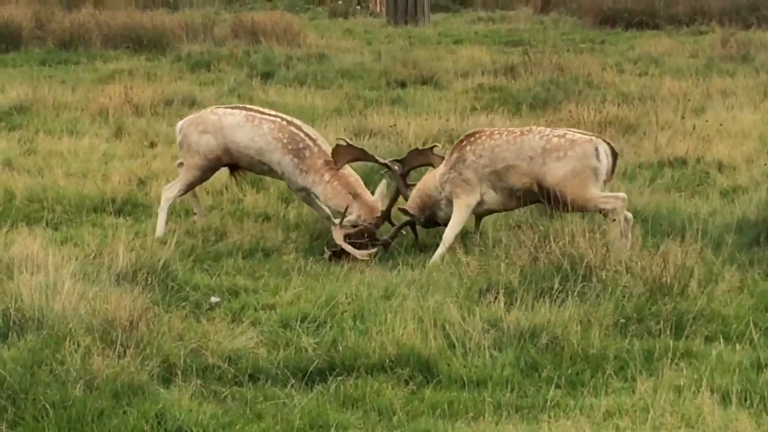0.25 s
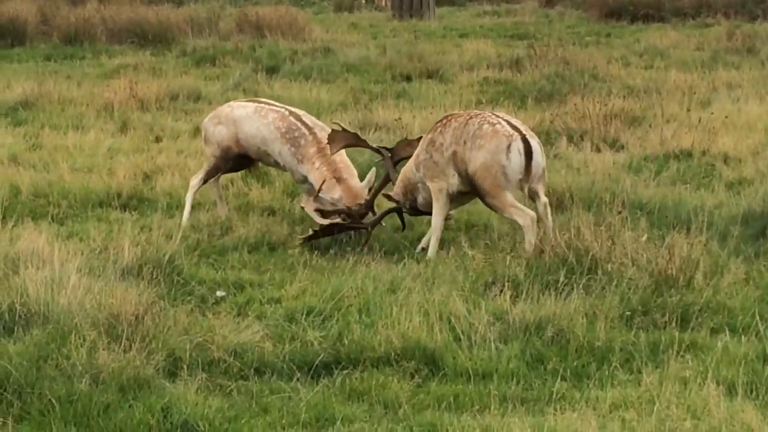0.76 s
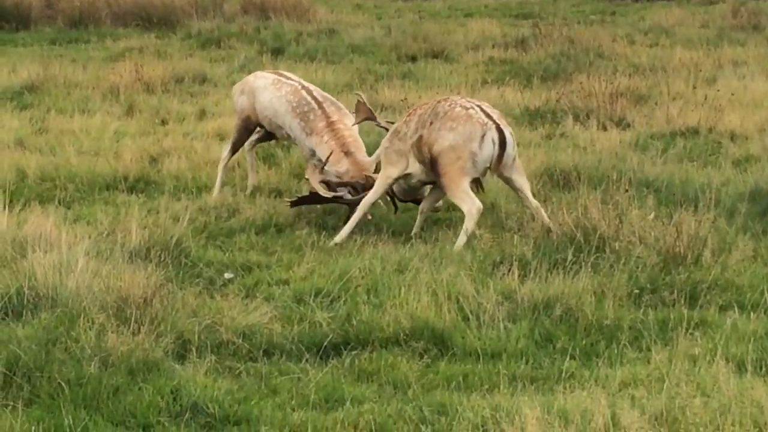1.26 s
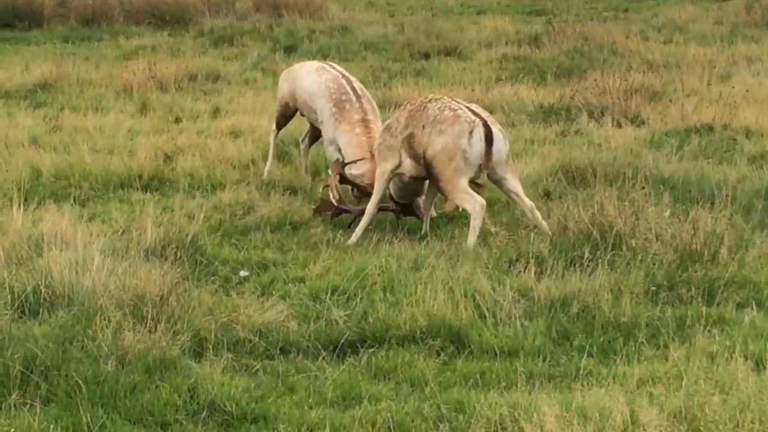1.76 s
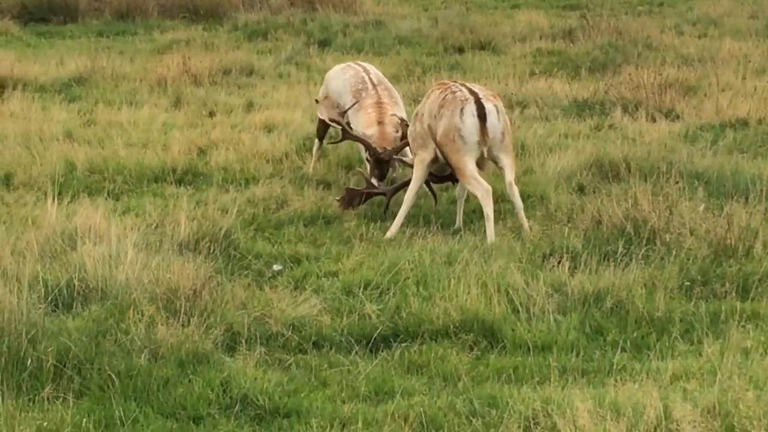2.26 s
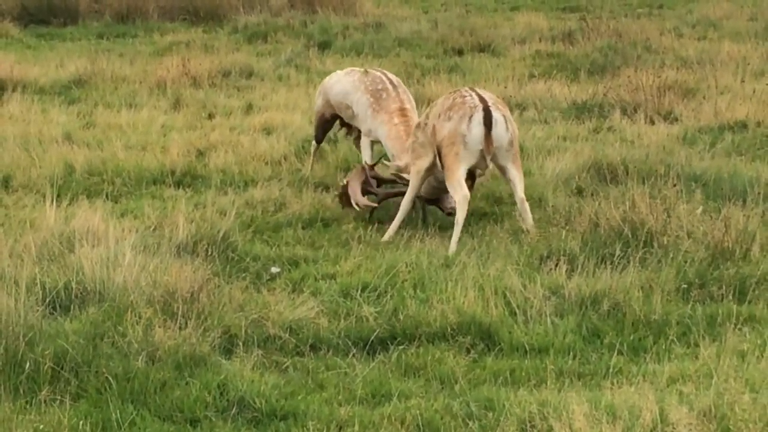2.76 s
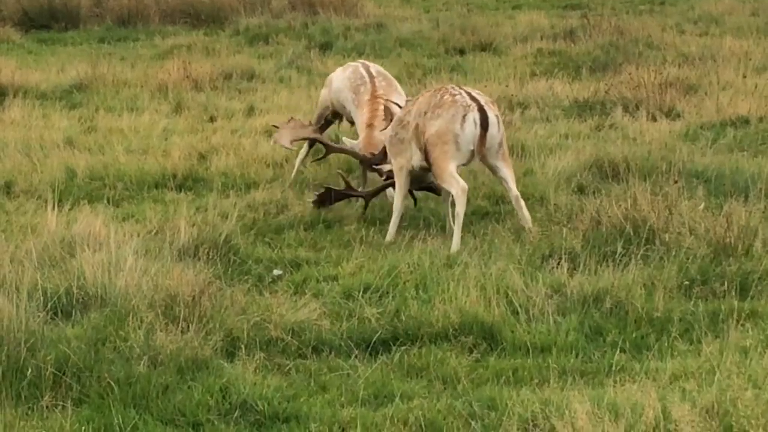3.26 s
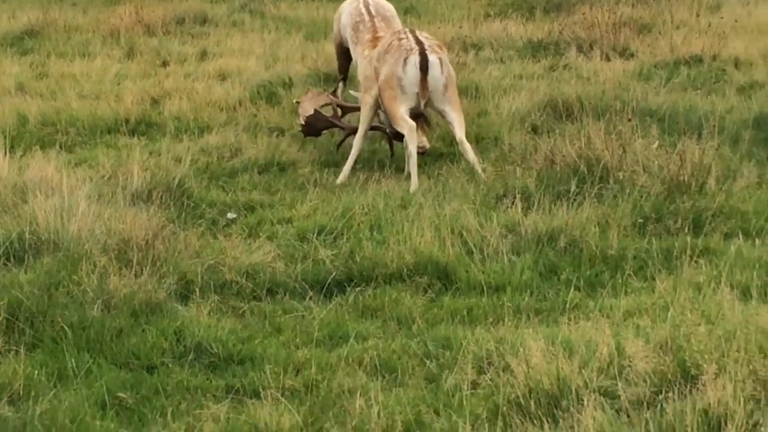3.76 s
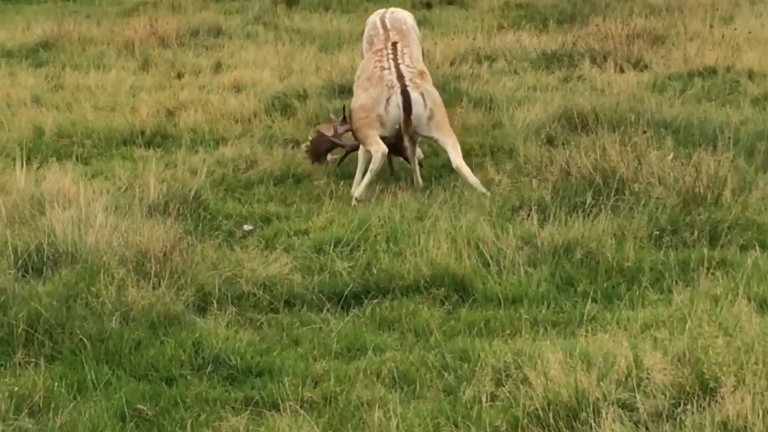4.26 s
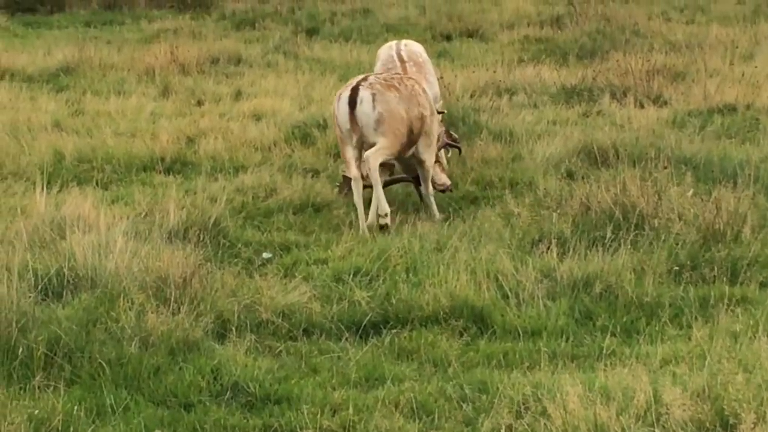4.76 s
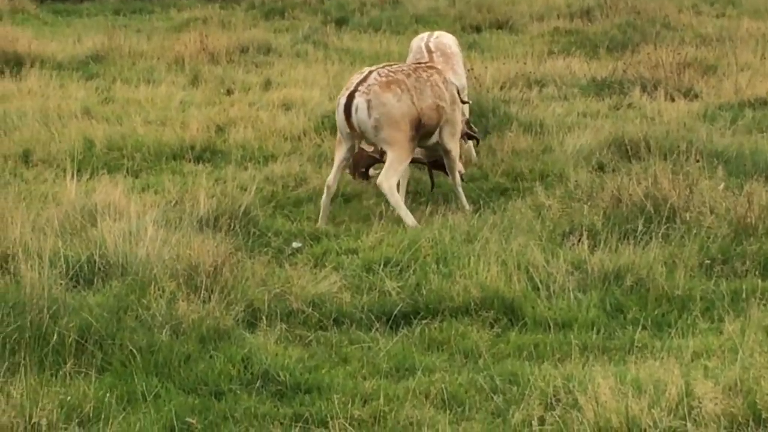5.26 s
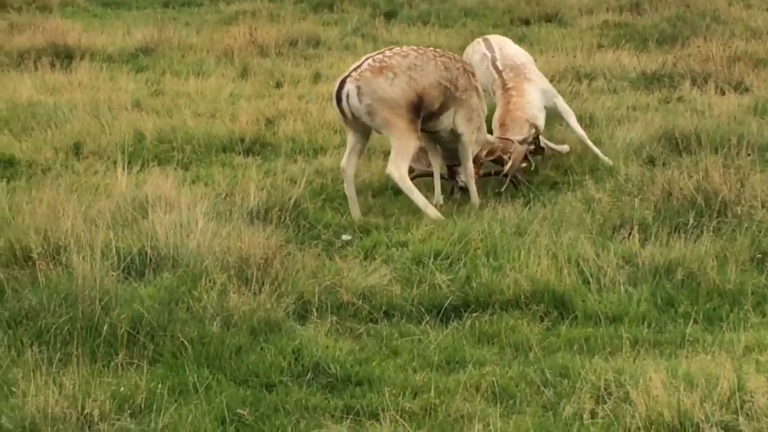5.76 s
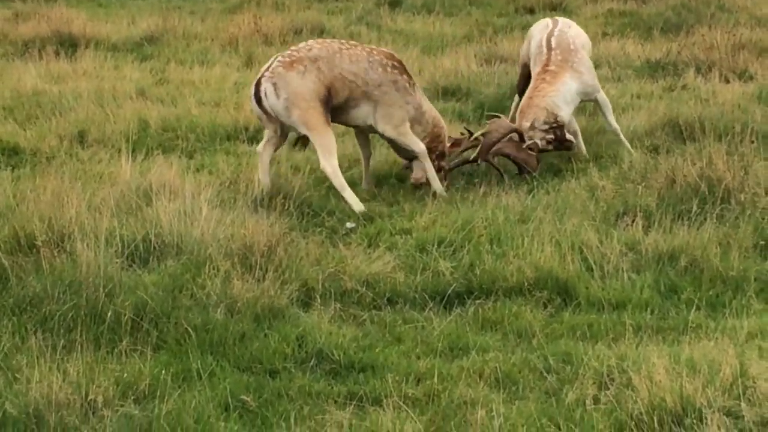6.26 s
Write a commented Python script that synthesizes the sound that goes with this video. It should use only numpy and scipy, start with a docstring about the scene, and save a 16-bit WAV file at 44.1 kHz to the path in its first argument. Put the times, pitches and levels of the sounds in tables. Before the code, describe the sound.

Two bucks spar on open grass, antlers clacking, rattling and scraping in uneven bursts over dull hoof thuds, grass swish and faint bird calls.

```python
"""Antlers clack, rebound and scrape in bouts as two fallow bucks spar on open grassland, some way off.
Hooves and lunging bodies thud, legs swish through grass, dry stalks tick, a far bird calls over a low park
murmur. The antlers are resonators struck by short forces or rubbed by many tiny slips. Thuds are low sine
waves with dull noise; grass, ground and park are coloured noise; the bird is a falling tone with harmonics."""
import sys
import numpy as np
from scipy import signal
from scipy.fft import rfft, irfft
from scipy.io import wavfile

SR = 44100
rng = np.random.default_rng(int(sys.argv[2]) if len(sys.argv) > 2 else 0)


def master(y):
    """Save y as 16-bit WAV."""
    cut = np.clip(np.atleast_2d(y).T, -1, 1)
    pcm = np.round(cut * 32767)  # scale
    wavfile.write(sys.argv[1], SR, pcm.astype(np.int16))


N = 287091

# antler blows: [t/s, level/dB, ring of the struck part f/Hz, top of the contact f/Hz,
# hardness/dB per octave, drag (no unit: .4 is a clean tap, 1.6 is grinding)]
BLOWS = [(0.0252, -34.5, 2500, 10800, -1, 1.06), (0.098, -35, 864, 11900, -3.0, 1.06),
         (0.5229, -37.0, 2490, 6740, -1.5, 0.83), (0.553, -40.5, 905, 2200, 6, 0.88),
         (0.5635, -33.5, 1110, 14000, -4.5, 1), (0.6328, -45, 4740, 10100, -1, 0.94),
         (0.7194, -32.5, 2700, 5430, 6.5, 0.6), (1.2805, -38, 2630, 6900, -0.5, 0.86),
         (1.337, -50.5, 2270, 9700, -3, 0.9), (1.4479, -32, 1180, 7150, -3.5, 1.6),
         (1.4819, -16.5, 970, 12400, -5, 0.66), (1.502, -21.0, 947, 6450, -2.5, 1.1),
         (1.601, -33.5, 783, 4800, 4.5, 1.6), (1.6077, -19, 2090, 5200, 0.5, 0.54),
         (1.6941, -38.5, 940, 3080, 8, 1.23), (1.773, -33, 1310, 2270, 3.5, 0.75),
         (1.8577, -47.0, 2330, 14000, -7.5, 0.65), (2.0725, -31.5, 1755, 8240, -1.5, 0.95),
         (2.413, -42.5, 4790, 8500, 4.5, 0.4), (2.5064, -26.5, 922, 5050, 4.0, 0.64),
         (2.5436, -34, 2740, 7900, -2, 1.4), (2.5725, -13, 986, 5260, -1, 1.07),
         (2.5985, -15, 1081, 5700, -2.5, 0.83), (2.6264, -28.5, 1140, 2200, 0.5, 0.67),
         (2.6489, -26.5, 1424, 3900, 0, 1.3), (2.7185, -32, 1980, 4830, -3, 0.63),
         (2.914, -48.5, 1110, 6600, -1.5, 1.5), (3.2192, -32.5, 782, 5450, -3.5, 1.44),
         (3.2304, -37, 715, 4850, 0, 1.14), (3.2643, -27.5, 1080, 11900, 4.5, 1.1),
         (3.2852, -33.5, 957, 11000, -2, 1.47), (3.3557, -41, 910, 2200, -2.5, 1.2),
         (3.3728, -39, 1560, 6500, -1.5, 0.75), (3.418, -42, 973, 11700, -5.5, 1.2),
         (3.453, -27.5, 1225, 2840, 0.5, 1.16), (3.5035, -18, 2680, 9900, 2, 1.73),
         (3.5157, -16.5, 1890, 8500, 0.5, 0.88), (3.5367, -28, 1940, 6800, -1.5, 0.81),
         (4.0672, -38.5, 1815, 3300, 6.5, 1.13), (4.1966, -49.5, 740, 5180, 1.0, 1.24),
         (4.2987, -51, 2600, 3900, -0.5, 0.61), (4.401, -21.5, 2650, 8200, 1.5, 0.86),
         (4.4217, -29.0, 2540, 4730, -2, 0.85), (4.4733, -39.5, 2610, 6500, 0, 0.81),
         (4.495, -46.5, 1190, 2600, 1, 1.16), (5.705, -38.5, 1900, 8100, -1.5, 1.8),
         (5.713, -28.5, 1870, 3460, -1.5, 0.8), (5.7869, -31.5, 4550, 13600, 0, 1.43),
         (5.8166, -31, 1186, 4900, -3.5, 0.99), (5.8988, -37.5, 1760, 5750, 10.5, 0.26),
         (6.052, -47.5, 910, 3970, -1.0, 0.74), (6.1326, -47, 2000, 2200, -6, 0.69),
         (6.185, -43, 1100, 2280, -1.0, 0.9), (6.3795, -26.5, 2040, 4270, 4.0, 0.64)]


def clacks(skid_t60=0.0091, skid=0.95, crack_db=-10.0, crack_t60=0.007, crack_top_hz=6000, lead_s=.0005):
    """Each blow is a sharp touch, a brief skid, a second touch and a slide, heard as a crack and a short hollow ring."""
    chatter_s, chatter_db = .0085, -13   # the tines touch again just after a blow; level at drag 1
    slide_db, slide_t60 = -16, 0.088   # and then slide off each other; level at drag 1, decay in s
    edge_share = .74   # a part carries few modes below this share of its ring pitch
    out, t = np.zeros(N), seconds(.1)
    window = np.sqrt(SR / 100)   # spreads unit energy over 10 ms, so that a level is an rms
    for s, db, ring_hz, top_hz, hardness, drag in BLOWS:
        edge_hz = edge_share * ring_hz
        touch = skid * unit_energy(rng.standard_normal(len(t)) * dying(t, skid_t60 * drag))
        touch[0] += 1
        slide = unit_energy(slips(t, per_s=2500, uneven_db=8.5) * dying(t, slide_t60))
        force = touch + from_db(slide_db) * drag ** 2 * slide
        add(force, chatter_s * rng.uniform(.7, 1.3), from_db(chatter_db) * drag ** 2 * touch)
        ring = antler(force, edge_hz, ring_hz, top_hz, hardness, drag)
        burst = rng.standard_normal(len(t)) * dying(t, crack_t60 * drag)
        crack = unit_energy(band(burst, edge_hz * .75, min(crack_top_hz, 1.1 * top_hz)))
        add(out, s - lead_s, from_db(db) * window * (ring + from_db(crack_db) * crack))
    return out


def scrapes(edge_hz=620, main_hz=1350, top_hz=6500, ring=0.25, rub_db=-7.0, rub_top_hz=3400):
    """A sliding tine catches on the ridges of the other antler: dense uneven slips into the same modes."""
    # tine sliding along a beam: [start t/s, end t/s, level at the end/dB]
    slides = [(0.084, 0.102, -43.5), (0.499, 0.509, -48), (0.542, 0.561, -43), (1.266, 1.281, -50),
              (1.385, 1.486, -33), (1.582, 1.625, -42.5), (2.02, 2.05, -44.5), (2.044, 2.081, -45),
              (2.49, 2.506, -38), (2.58, 2.62, -30), (2.698, 2.761, -40.5), (2.784, 2.911, -52),
              (3.35, 3.42, -53), (3.443, 3.5, -47.5), (3.507, 3.54, -31), (5.672, 5.688, -49),
              (5.757, 5.823, -40.5)]
    swell_db, hardness = 6.5, -4.5   # pressure builds until the tine slips off; dB per octave
    out = np.zeros(N)
    for start, end, db in slides:
        length = max(end - start, .005)
        t = seconds(length + .04)
        stroke = from_db(db + np.interp(t, [0, length], [-swell_db, 0]))
        # the tine bites, then lets go
        stroke *= np.interp(t, [0, .15 * length, .92 * length, length], [0, 1, 1, 0])
        stroke *= flutter(depth_db=2.0, per_s=190, size=len(t))   # the pressure is unsteady
        force = slips(t, per_s=3300, uneven_db=4.5) * stroke
        rasp = antler(force, edge_hz, main_hz, top_hz, hardness, ring,
                      main_db=2.0, vary_db=0.5, detune=0.026)
        rub = unit_energy(band(force, edge_hz, rub_top_hz))   # the slips also sound directly
        rasp += from_db(rub_db) * rub
        add(out, start, rasp * np.linalg.norm(stroke))
    return out


def antler(force, edge_hz, main_hz, top_hz, hardness, length, t60=0.032, shorter_up=0.75, main_db=4.5,
           leak_db=-15.0, vary_db=1.0, detune=.04, travel_s=.0006):
    """A contact force rings the modes; a short tine carries few lows, a hard contact more highs, a broad one no top."""
    # antler modes, the pitches at which it rings: [f/Hz, level/dB]
    modes = [(366, 2), (398, 2), (484, -5), (538, -4), (613, -3.5), (699, -4.5), (753, 0), (904, -1),
             (947, 1.5), (1098, -4), (1227, 5), (1485, 4), (1614, 5.5), (1916, 5), (2002, -3), (2271, 0.5),
             (2670, -1), (2993, -1), (3348, 1), (3789, 1.5), (4521, -2.5), (4888, 2.5), (5620, -8.5),
             (6266, -0.5), (7202, -1.5), (8559, -13.5), (9743, -17.5), (10734, -12), (12112, -20),
             (14211, -12)]
    hz, db = np.transpose(modes)
    # every spot rings a little differently
    hz = np.minimum(hz * np.exp(detune * rng.standard_normal(len(hz))), SR * .45)
    nearest = np.argmin(np.abs(np.log(hz / main_hz)))
    hz[nearest] = main_hz
    db = db + hardness * np.log2(hz / main_hz) + rng.normal(0, vary_db, len(hz))
    db[nearest] += main_db
    carried = np.sqrt(from_db(leak_db) ** 2 + 1 / (1 + (edge_hz / hz) ** 8))
    # bone damps its high modes fastest; t60 holds at 1500 Hz and length 1
    mode_t60 = t60 * max(length, .2) * (1500 / hz) ** shorter_up
    radius = from_db(-60 / (SR * mode_t60))
    gains = rng.choice([-1, 1], len(hz)) * from_db(db) * carried
    out = np.zeros(len(force))
    for f, r, gain in zip(hz, radius, gains):
        mode = signal.lfilter([1, 0, -1], [1, -2 * r * np.cos(2 * np.pi * f / SR), r * r], force)
        delay_s = travel_s * np.sqrt(1000 / f)   # low bending waves travel slower
        add(out, delay_s, gain * unit_energy(mode))
    return unit_energy(band(out, 120, top_hz, order=3))


def slips(t, per_s, uneven_db):
    """Dense uneven catches of a tine on ridged bone, as single-sample clicks at random times."""
    return (rng.random(len(t)) < per_s / SR) * from_db(rng.normal(0, uneven_db, len(t)))


def thuds(t60=0.061, rise=.003, puff_db=-6.5, puff_octaves=1.3):
    """Hooves and bodies thud and the heads take each blow: a few low cycles and a dull puff around them."""
    # low thuds of hooves and of the bodies lunging at the blows: [t/s, level/dB, thud f/Hz]
    low_thuds = [(.245, -41.5, 70), (.56, -42, 112), (.975, -41.5, 78), (1.601, -44.5, 130),
                 (2.103, -42, 90), (2.134, -36.5, 101), (2.576, -28, 140), (2.608, -35, 115),
                 (3.255, -37.5, 112), (3.461, -37, 100), (3.508, -36, 150), (3.555, -34, 87.4),
                 (3.952, -44.5, 91), (4.48, -37, 100), (5.785, -38, 173), (6.011, -40, 89.5),
                 (6.036, -37, 113)]
    skull_db, skull_hz = -22, 262   # thud of the heads, relative to a blow that rings at 1 kHz
    skull_db_per_octave = -3   # thin high tines shake the head less than the thick beam
    out, t = np.zeros(N), seconds(0.3)
    shape = (1 - np.exp(-t / rise)) * dying(t, t60)
    shape /= shape.max()
    skulls = []
    for s, db, ring_hz, *_ in BLOWS:
        head_db = db + skull_db + skull_db_per_octave * np.log2(ring_hz / 1000)
        skulls.append((s, head_db, skull_hz))
    for s, db, hz in list(low_thuds) + skulls:
        noise = band(rng.standard_normal(len(t)), hz / 2, hz * 2 ** puff_octaves, order=3)
        puff = from_db(puff_db) * rms_one(noise)
        add(out, s, from_db(db) * shape * (np.sin(2 * np.pi * hz * t) + puff))
    return out


def stalks(uneven_db=5.5, low_hz=2200, high_hz=9000, t60=.004, boost_db=16.0, thick_boost_db=13.0):
    """Dry stalks snap under the hooves as tiny bright ticks of fast-dying noise."""
    # stretches of dry stalks being crushed: [start t/s, end t/s, snaps per s, level before the boost/dB]
    crushes = [(1.96, 2.42, 160, -54), (5.76, 5.934, 370, -56), (5.95, 6.51, 140, -60.5)]
    # the thickest stalks: [t/s, level before the boost/dB]
    thick_snaps = [(1.9759, -40), (2.0114, -31), (2.022, -38.5), (2.138, -37), (2.176, -35.5),
                   (2.2288, -40.5), (2.3084, -34.5), (2.37, -45.5)]
    per_s, db = np.full(N, 7.0), np.full(N, -59.0)   # stray snaps: rate, level before the boost
    now = np.arange(N) / SR
    for start, end, crush_per_s, crush_db in crushes:
        crushed = (now >= start) & (now < end)
        per_s[crushed], db[crushed] = crush_per_s, crush_db
    spread_db = uneven_db * np.clip(rng.standard_normal(N), -2, 2)
    snaps = (rng.random(N) < per_s / SR) * from_db(db + boost_db + spread_db)
    for s, thick_db in thick_snaps:
        add(snaps, s, from_db([thick_db + thick_boost_db]))
    decay = unit_energy(dying(seconds(.01), t60))
    splinter = signal.fftconvolve(snaps, decay)[:N] * rng.standard_normal(N)
    return band(splinter, low_hz, high_hz)


def footwork():
    """Strength of the strides: each rises, holds while the leg sweeps, and dies as the grass settles."""
    # legs sweeping through the grass: [start t/s, length/s, swish level/dB]
    strides = [(-0.003, 0.22, -58.5), (0.443, .22, -61), (1.565, 0.075, -55), (1.8, 0.035, -55.5),
               (1.978, 0.094, -56), (2.38, .08, -62.5), (2.697, 0.15, -67), (3.342, 0.26, -64),
               (4.355, 0.13, -60.5), (5.694, 0.15, -57), (6.026, 0.26, -65), (6.434, .09, -61.5)]
    attack_s, t60 = .03, 0.28   # the swish rises fast and settles slowly
    out = np.zeros(N)
    for s, length, db in strides:
        t = seconds(length + t60)
        rise = np.minimum(t / attack_s, 1)
        add(out, s, from_db(db) * rise * dying(np.maximum(t - length, 0), t60))
    return out


def swish(strides):
    """Legs brush the grass: coloured noise follows the strides over a light rustle of shifting feet."""
    # colour of the swish: [f/Hz, level/dB]
    colour = [(600, 5), (1500, 3.5), (3000, 2), (6500, -1.5), (9000, -5.5), (12000, -7.5), (15500, -7.5)]
    # light rustle of shifting feet: [t/s, level/dB]
    shuffle = [(0, -68), (1, -65), (2.6, -64.5), (3.9, -72), (4.8, -69), (5.5, -74.5), (5.9, -60.5),
               (6.51, -65)]
    s, db = np.transpose(shuffle)
    rustle = from_db(np.interp(np.arange(N) / SR, s, db))
    return np.hypot(strides, rustle) * coloured_noise(colour) * flutter(depth_db=3.4, per_s=56)


def rumble(strides, trample_db=4.5, distant_db=-56):
    """The ground rumbles with the strides, over a distant rumble: low noise that wavers in level."""
    # colour of the rumble: [f/Hz, level/dB]
    colour = [(20, -19.5), (32, -4.5), (45, -0.5), (70, 0), (115, -3), (170, -7), (300, -20.5)]
    strength = np.hypot(from_db(trample_db) * strides, from_db(distant_db))
    return strength * coloured_noise(colour) * flutter(depth_db=4.0, per_s=22)


def bird(chirp_s=.082, end_hz=2797, waver=0.023, lower_db=-9.5, upper_db=-10.0):
    """Thin calls that all fall to the same note, heard mostly by their second harmonic."""
    # calls of the far bird: [t/s, second harmonic at the start f/Hz, level/dB]
    calls = [(.34, 3850, -69), (.84, 3600, -65), (1.13, 3490, -73.5), (3.05, 4450, -63), (3.92, 4100, -69),
             (4.2, 3700, -73), (4.866, 4450, -64.5), (5.126, 3750, -69.5), (5.35, 4100, -75.5)]
    out, t = np.zeros(N), seconds(chirp_s)
    for s, start_hz, db in calls:
        wobble = rms_one(band(rng.standard_normal(len(t)), 60, 500))
        hz = np.linspace(start_hz, end_hz, len(t)) * (1 + waver * wobble)
        phase = np.pi * np.cumsum(hz) / SR   # the fundamental runs at half of hz
        call = from_db(lower_db) * np.sin(phase) + np.sin(2 * phase) + from_db(upper_db) * np.sin(3 * phase)
        swell = np.sqrt(2) * np.sin(np.pi * t / chirp_s)
        add(out, s, from_db(db) * swell * call)
    return out


def park(level_db=-60):
    """The low murmur of the park is steady coloured noise."""
    # colour of the murmur: [f/Hz, level/dB]
    colour = [(200, -2.5), (315, 1.5), (640, -0.5), (950, 1), (1400, -4.5), (2200, -12), (3200, -13.5),
              (4500, -17.5), (7000, -23.5), (10000, -31), (15500, -28.5)]
    return from_db(level_db) * coloured_noise(colour)


def meadow(x, near_db=-18.0206, near_t60=0.052, near_top_hz=4500, far_db=-42.0206, far_t60=1.0, far_top_hz=3000):
    """Bodies and ground scatter the sound almost at once; distant trees return a faint dull tail."""
    t = seconds(0.93)
    near = rng.standard_normal(len(t)) * dying(t, near_t60) * (t > .003)
    near = unit_energy(band(near, 130, near_top_hz, order=1))
    far = rng.standard_normal(len(t)) * dying(t, far_t60) * (1 - np.exp(-t / .04))
    far = unit_energy(band(far, 200, far_top_hz, order=1))
    echoes = from_db(near_db) * near + from_db(far_db) * far
    return x + signal.fftconvolve(x, echoes)[:N]


def from_db(db):
    """Decibels to gain."""
    return 10 ** (np.asarray(db) / 20)


def rms_one(x):
    """Scale to rms 1."""
    return x / np.sqrt(np.mean(x ** 2) + 1e-20)


def unit_energy(x):
    """Scale to a sum of squares of 1."""
    return x / np.sqrt(np.sum(x ** 2) + 1e-20)


def seconds(length):
    """Time axis of a short sound."""
    return np.arange(max(int(length * SR), 8)) / SR


def dying(t, t60):
    """Exponential decay, 60 dB down after t60 seconds."""
    return np.exp(-np.log(1000) * t / max(t60, 1e-4))


def add(out, s, sound):
    """Mix a sound in at time s."""
    at = int(np.clip(round(s * SR), 0, len(out) - 1))
    out[at:at + len(sound)] += sound[:len(out) - at]


def band(x, low_hz, high_hz, order=2):
    """Causal band-pass: keeps the pitches between two edges."""
    high_hz = min(high_hz, SR * .45)
    edges = [min(low_hz, high_hz / 2), high_hz]
    return signal.sosfilt(signal.butter(order, edges, "band", fs=SR, output="sos"), x)


def flutter(depth_db, per_s, size=N):
    """A gain that wanders at random, with per_s new targets each second."""
    steps = rng.standard_normal(2000)
    return from_db(depth_db * np.interp(np.arange(size) / SR * per_s, np.arange(len(steps)), steps))


def coloured_noise(spectrum):
    """Steady noise of rms 1 with the given spectrum, falling 42 dB per octave past its ends."""
    hz, db = np.transpose(spectrum)
    octave = np.log2(np.maximum(np.fft.rfftfreq(N, 1 / SR), 1))
    known = np.log2(hz)
    beyond = np.abs(octave - np.clip(octave, known[0], known[-1]))
    gain = from_db(np.interp(octave, known, db) - 42 * beyond)
    return rms_one(irfft(rfft(rng.standard_normal(N)) * gain, N))


def scene():
    """The fight, the grass and the park; the strides drive both the swish and the rumble of the ground."""
    strides = footwork()
    fight = meadow(clacks() + scrapes() + stalks() + bird()) + thuds()
    return (fight + swish(strides) + rumble(strides) + park())[None]


def record(dry, cutoff_hz=15600):
    """The highest peaks are rounded and the top is cut."""
    rounded = 1.307 * np.tanh(dry / 1.31)
    return signal.sosfilt(signal.ellip(10, .1, 80, cutoff_hz, fs=SR, output="sos"), rounded)


dry = scene()
out = record(dry)
master(out)
```